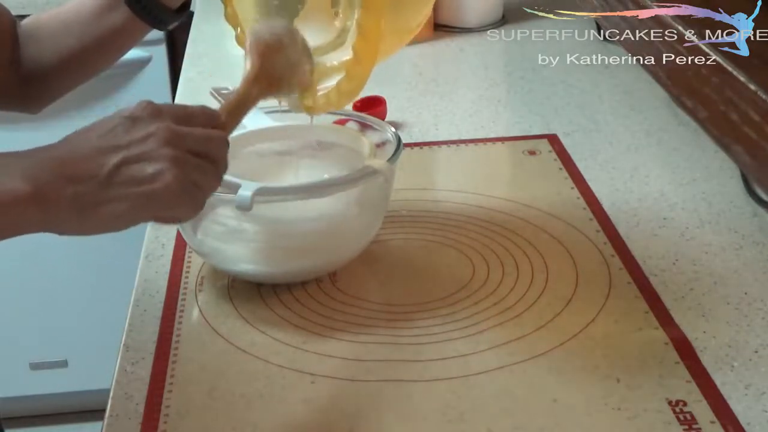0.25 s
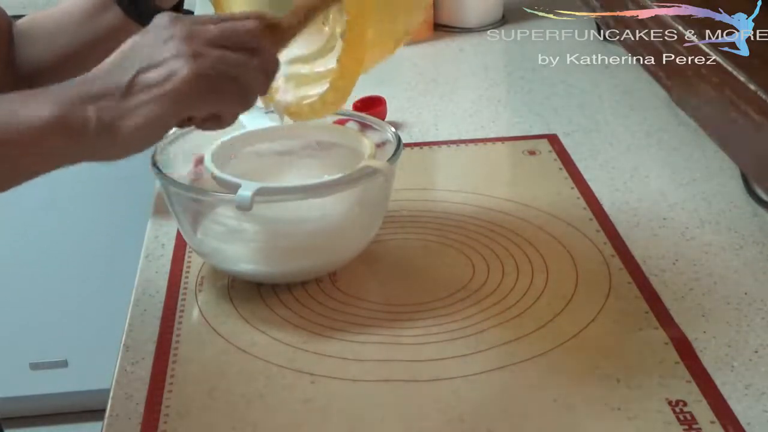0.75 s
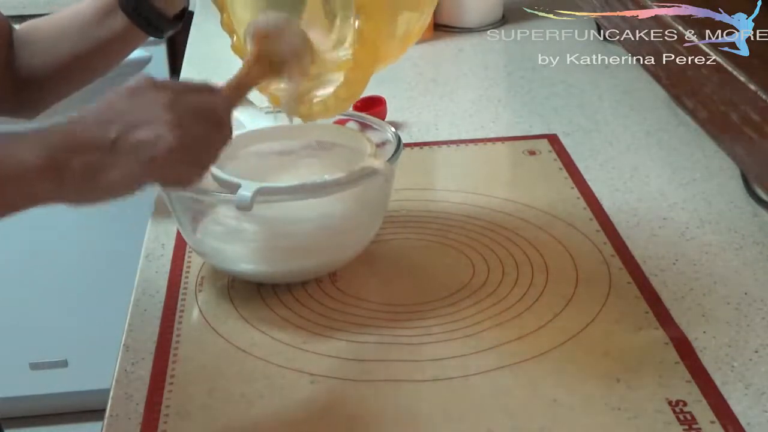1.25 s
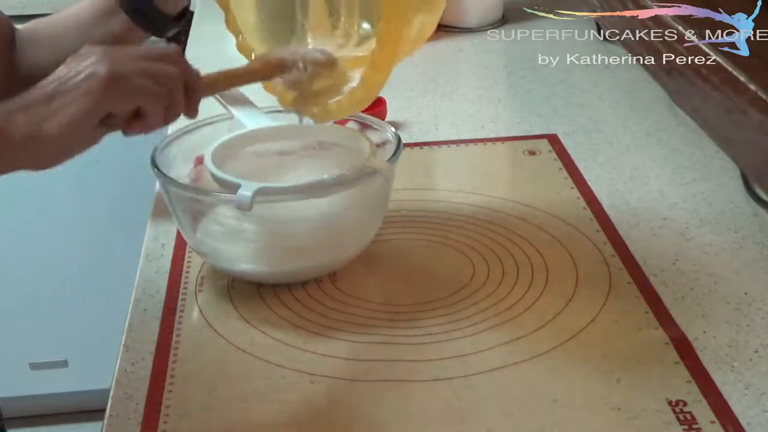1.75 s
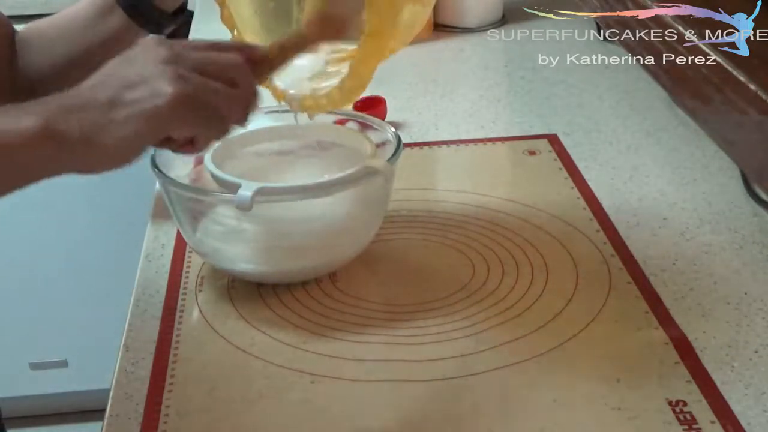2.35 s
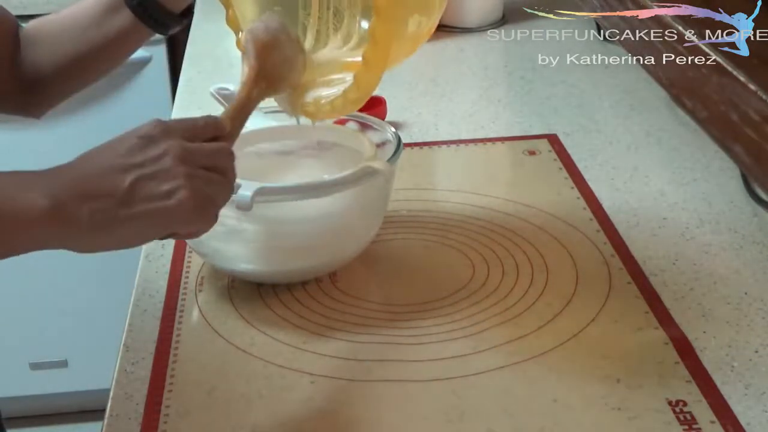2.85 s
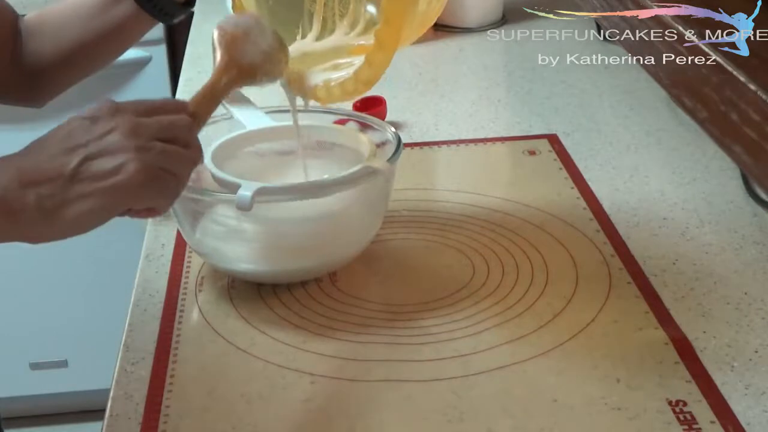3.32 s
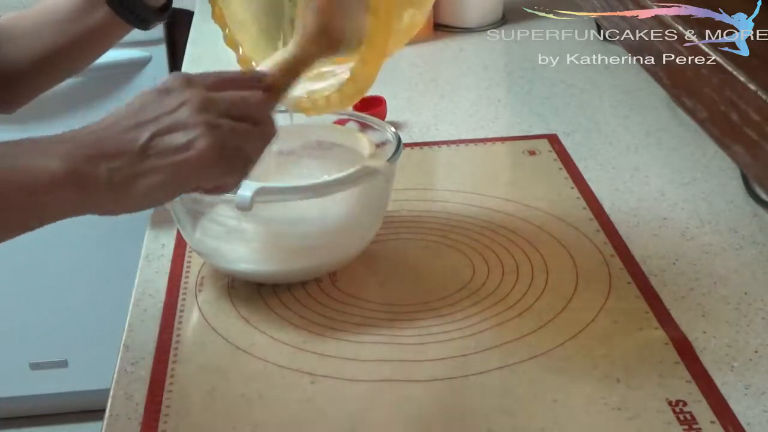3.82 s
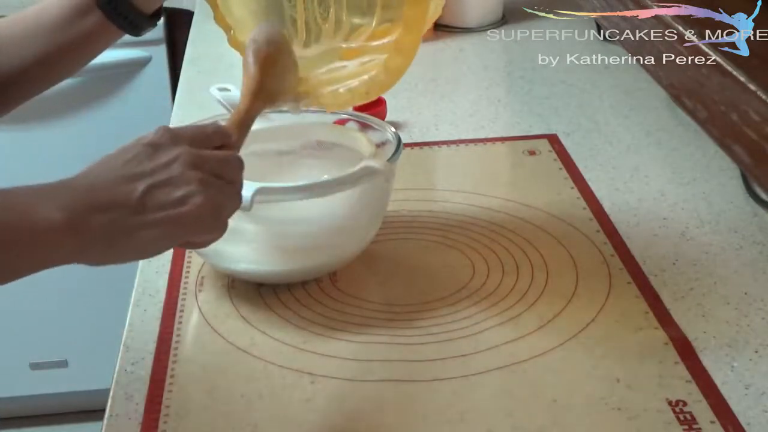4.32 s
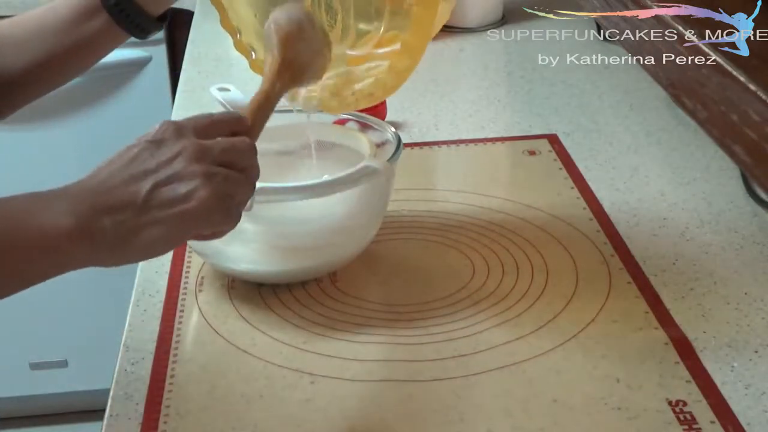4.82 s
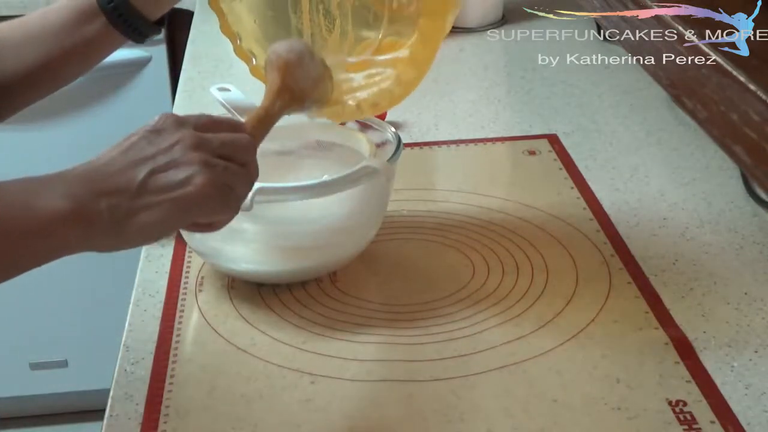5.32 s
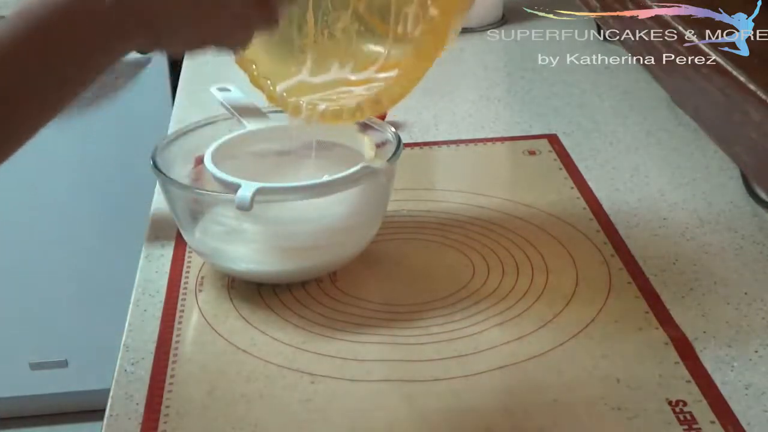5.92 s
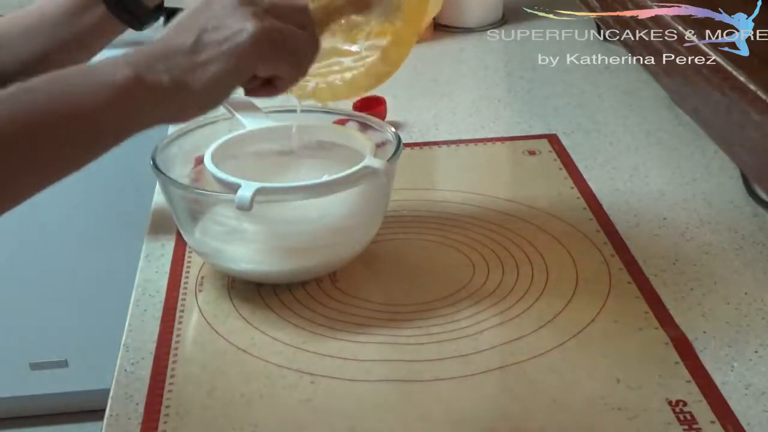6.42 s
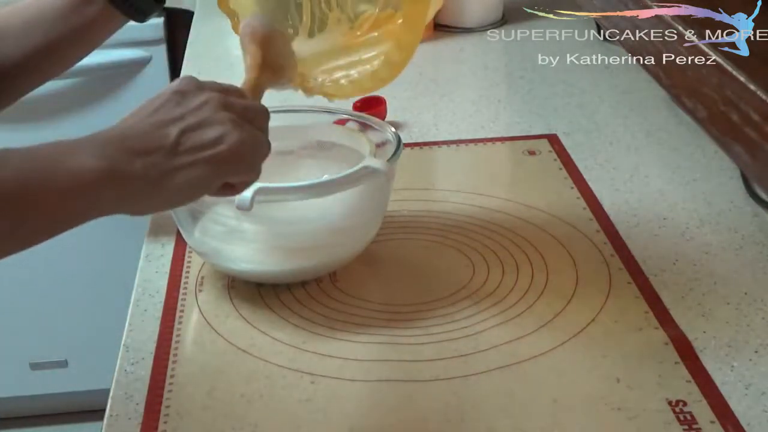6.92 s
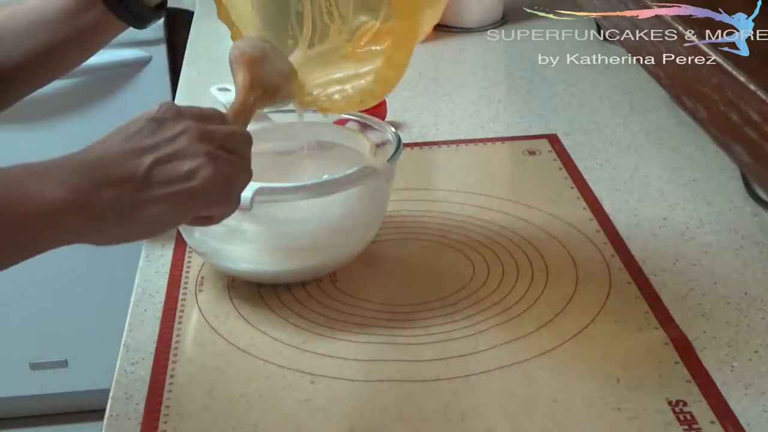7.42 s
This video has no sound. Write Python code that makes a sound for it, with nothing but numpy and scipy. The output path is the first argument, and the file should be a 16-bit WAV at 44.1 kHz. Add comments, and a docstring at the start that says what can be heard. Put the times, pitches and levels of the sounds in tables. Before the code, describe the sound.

A wooden spoon raps hard on a sieve over a glass bowl, then scrapes sticky batter from a plastic bowl over steady appliance hum.

```python
"""A wooden spoon is knocked clean over a sieve on a glass bowl and scrapes sticky batter out of a plastic bowl.
Each knock sums damped modes of spoon and bowl, a noise crack and a low thud of the counter.
Between knocks, patchy filtered noise hisses and short noise bursts smack as the spoon moves in the batter.
The place is a small hard kitchen, heard as a decaying diffuse noise tail at two closely spaced microphones.
An appliance hums throughout: motor harmonics with the drone and air noise of a fan."""
import sys
import numpy as np
from scipy import signal
from scipy.fft import rfft, irfft, next_fast_len
from scipy.io import wavfile
from scipy.ndimage import uniform_filter1d, map_coordinates

SR = 44100
rng = np.random.default_rng(int(sys.argv[2]) if len(sys.argv) > 2 else 0)


def transcribe(u):
    """Save the signal u as a 16-bit wav file named by the first command-line argument.

    u: samples, shape (n,) or (channels, n), limited to [-1, 1]; the rate is SR.
    q: integer samples, one column per channel.
    """
    v = np.clip(np.atleast_2d(u).T, -1, 1)
    q = np.round(v * 32767).astype(np.int16)
    wavfile.write(sys.argv[1], SR, q)


N = 338247


def amp(db):
    """Decibels to gain."""
    return 10 ** (np.asarray(db) / 20)


def unit(x):
    """x at rms 1."""
    return x / np.sqrt(np.mean(x ** 2) + 1e-20)


def along(points, hz):
    """(frequency, value) points read on a log frequency axis."""
    f, v = np.transpose(points)
    return np.interp(np.log(hz + 1), np.log(f + 1), v)


def filtered(x, response):
    """x with its spectrum multiplied by a response of frequency."""
    n = x.shape[-1]
    padded = next_fast_len(n + 8192)
    spectrum = rfft(x, padded) * response(np.fft.rfftfreq(padded, 1 / SR))
    return irfft(spectrum, padded)[..., :n]


def coloured(x, db_of_hz, size=2048):
    """x through a causal minimum-phase filter, which keeps attacks sharp."""
    cepstrum = irfft(np.log(amp(db_of_hz(np.fft.rfftfreq(size, 1 / SR)))))
    cepstrum[1:size // 2] *= 2
    cepstrum[size // 2 + 1:] = 0
    impulse = irfft(np.exp(rfft(cepstrum)))
    return signal.fftconvolve(x, impulse)[:len(x)]


def wobble(rate):
    """A smooth random curve, rate knots a second."""
    knots = rng.standard_normal(int(N * rate / SR) + 4)
    return map_coordinates(knots, [np.arange(N) * rate / SR])


def fade(t, t60):
    """Decay by 60 dB in t60 seconds."""
    return np.exp(-np.log(1000) * t / t60)


def ringing(modes, t, touch, scatter_db):
    """Damped modes of alternating sign, weighted by the (hz, db) touch and by chance."""
    total = 0
    for k, (hz, db, t60) in enumerate(modes):
        level_db = db + along(touch, hz) + scatter_db * rng.standard_normal()
        total = total + (-1) ** k * amp(level_db) * fade(t, t60) * np.sin(2 * np.pi * hz * t)
    return total


def add(track, s, sound):
    """Mix a sound into the track at time s, in seconds."""
    part = track[..., round(s * SR):][..., :sound.shape[-1]]
    part += sound[..., :part.shape[-1]]


def diffuse(pair):
    """Sound from all round at two close microphones: a shared part plus an opposed one, weak in the bass."""
    opposed_db = [(60, -14), (150, -22.0), (300, -20.0), (600, -8.0), (1200, -5.0),
                  (2400, -7.5), (4400, -6), (9000, -12.5), (14000, -47)]
    side = filtered(pair[1], lambda hz: amp(along(opposed_db, hz)))
    return np.array([pair[0] + side, pair[0] - side])


def placed(x, left_db, lead):
    """A source left of centre: louder at the left microphone, and lead seconds earlier."""
    half = np.array([[.5], [-.5]])
    return amp(left_db * half) * filtered(x, lambda hz: np.exp(2j * np.pi * hz * lead * (half - .5)))


MOTOR_HZ = 58.63  # turns per second
# motor lines, panned as by standing waves: multiple [of MOTOR_HZ], level_db [rms], left_right_db
MOTOR_LINES = [(1, -53.5, 1.5), (3, -48.5, 1.5), (4, -54, 3.5), (8, -54.5, -2), (10, -51, 0),
               (11, -43.5, -5), (12, -46, -1), (13, -67.5, -13)]
# fan and cabinet resonances: centre_hz, width_hz, level_db [rms]
FAN_DRONE = [(46.6, 4, -63), (112, 8.7, -59.5), (134.4, 16.3, -50.5), (182, 8.5, -51), (209, 24, -50),
             (239.1, 7.4, -39.5), (273.6, 40, -43.5), (348.4, 10.3, -52.5), (368.4, 4, -54),
             (516.4, 57, -49.5)]
# colour of the fan's air noise: freq_hz, density_db [per Hz, relative]
FAN_AIR = [(20, -22), (50, -6), (88, -25.5), (120, -11.5), (220, 6.5), (320, 2.5), (450, -1), (680, -4),
           (850, -6.5), (1300, -10.5), (2000, -20), (4000, -26), (9000, -34.5), (15500, -41)]


def appliance():
    """Neighbouring motor harmonics beat once a turn; the fan adds a wavering drone and air noise."""
    phase = 2 * np.pi * MOTOR_HZ * np.arange(N) / SR + 0.03 * wobble(3.17)
    total = np.zeros((2, N))
    for multiple, db, pan_db in MOTOR_LINES:
        level = np.sqrt(2) * amp(db + 0.64 * wobble(3.93))
        pan = amp([[pan_db / 2], [-pan_db / 2]])
        total += level * pan * np.cos(round(multiple) * phase)

    def noise(response):
        return unit(diffuse(filtered(rng.standard_normal((2, N)), response)))

    for centre, width, db in FAN_DRONE:
        total += amp(db) * noise(lambda hz: 1 / (1 + ((hz - centre) / width * 2) ** 2))
    return total + amp(-40.0) * noise(lambda hz: amp(along(FAN_AIR, hz)))


THUD_CYCLES, THUD_LAG_S = .75, 0.0013  # cycles until the thud is strongest; its delay after the contact


def thud(t, hz):
    """The counter gives for a cycle or two under a blow."""
    cycles = hz * np.maximum(t - THUD_LAG_S, 0)
    u = cycles / THUD_CYCLES
    return -u ** 2 * np.exp(2 - 2 * u) * np.sin(2 * np.pi * cycles)


def cushion(t):
    """Batter cushions the contact, so the ringing takes a few ms to reach full strength."""
    return 1 - np.exp(-t / 0.0015)


# spoon and the rim it meets, quickly damped: mode_hz, level_db [relative], t60_s
SPOON_MODES = [(340, 2, 0.049), (600, 1, 0.035), (801, 5, 0.03), (1118, 10, 0.038), (1376, 0, 0.065),
               (1833, 10.5, 0.025), (2222, 5, 0.031), (2900, -9, .028), (4060, 3.5, 0.028),
               (4870, 8, 0.0074)]


def spoon_clack(t, touch):
    """The wooden spoon's short modes sound against the rim."""
    return amp(-0.5) * cushion(t) * ringing(SPOON_MODES, t, touch, scatter_db=4.0)


# colour of the contact noise: freq_hz, density_db [per Hz, relative]
CRACK_COLOUR = [(100, -10), (500, -12), (1200, 4.5), (2200, 5), (3500, 1.5), (6000, -1), (9500, -1.5),
                (12000, -13), (16000, -23)]


def contact_crack(t, touch):
    """The contact itself is a fast burst of coloured noise."""
    burst = rng.standard_normal(len(t)) * fade(t, 0.022) * (1 - np.exp(-t / .0003))
    return amp(17) * coloured(burst, lambda hz: along(CRACK_COLOUR, hz) + along(touch, hz))


# glass bowl with the sieve on it: mode_hz, level_db [relative], t60_s
GLASS_MODES = [(276.4, 4, 0.22), (342.5, 0.5, 0.25), (443, 6, 0.44), (576.5, 4, 0.33), (747, 0, 0.32),
               (771, -13, 0.18), (824, -13, 0.39), (1011, 2.5, 0.11), (1127, 0.5, 0.37), (1177, -9, 0.15),
               (1217, 5, 0.21), (1408, -2, 0.12), (1620, -0.5, 0.23), (1807, -4, 0.55), (2260, -18, 0.2),
               (3120, -5, 0.098)]
# plastic bowl's wall, damped by the hand that holds it: mode_hz, level_db [relative], t60_s
WALL_MODES = [(273, 3.5, .2), (354, -3, .2), (445, -1, 0.38), (578, 4, 0.42), (910, -2, 0.23),
              (1405, 7, 0.24), (1770, 6, .22), (2010, -3, .17), (2280, 0, .25), (2580, 0, .19),
              (3070, 1, 0.13), (4027, -1, .18)]


def bowl_ring(t, touch, spot, sustain_db):
    """Rim and sieve ring the glass bowl, wall and batter the plastic one."""
    modes = GLASS_MODES if spot in ("rim", "sieve") else WALL_MODES
    # each mode reaches the two microphones at its own strength
    at_microphones = np.array([ringing(modes, t, touch, scatter_db=3.0) for _ in range(2)])
    return amp(sustain_db - 3.0) * cushion(t) * at_microphones


# what a knock radiates into the room: freq_hz, density_db [per Hz, relative]
KNOCK_RADIATION = [(60, -12), (160, 6), (270, -2), (430, -3), (620, -1), (900, -5.5), (1170, 7), (1500, 1),
                   (2000, 0), (3300, -7), (5500, -6.5), (9500, -9.5), (15000, -31)]


def radiated_pulse(t, touch):
    """The knock seen by the room: a single coloured impulse."""
    return coloured(1.0 * (t == 0), lambda hz: along(KNOCK_RADIATION, hz) + along(touch, hz))


# decay of the kitchen: freq_hz, t60_s
KITCHEN_DECAY = [(150, 0.03), (600, 0.4942), (3000, 0.4335), (10000, 0.39)]
# strength of its answer: freq_hz, level_db [relative]
KITCHEN_COLOUR = [(60, 12), (160, 10), (300, 12), (600, 8), (1200, -6), (2500, -1.5), (6000, -5.5),
                  (14000, -5)]


def kitchen(x):
    """The room's answer to x: a diffuse noise tail in which each frequency dies at its own speed."""
    hz, t, z = signal.stft(rng.standard_normal((2, SR // 2)), SR, nperseg=256)
    decay = fade(t, along(KITCHEN_DECAY, hz)[:, None])
    tail = signal.istft(z * decay, SR, nperseg=256)[1]
    tail = filtered(tail / np.linalg.norm(tail[0]), lambda f: amp(along(KITCHEN_COLOUR, f)))
    tail = diffuse(tail)
    # the walls need a few ms to answer
    build_up = 1 - np.exp(-(np.arange(tail.shape[1]) / SR / 0.0062) ** 2)
    return signal.fftconvolve(x[None], tail * build_up, axes=1)[:, :len(x)]


# centres of a knock's registers, thud, hollow, body, ring, clack, tick, splat: centre_hz
REGISTERS = [170, 360, 660, 1150, 2100, 5500, 10500]
# spoon knocks: start_s, spot, strength_db [relative], follow_through_db, hardness_db [per octave]
SPOON_KNOCKS = [(0.1297, "rim", -21, 5, -1.5), (0.3103, "rim", -27, 5, -.5),
                (0.4726, "rim", -28.5, 4, -1.5), (0.878, "sieve", -21, 5, 0),
                (1.5374, "wall", -26.5, -2.5, 0), (2.0163, "wall", -33.5, 1.5, -2.5),
                (2.46, "batter", -39, -2.5, -1.5), (3.4661, "rim", -19, 0, 0),
                (3.633, "rim", -19.5, -6.5, -0.4), (3.9441, "batter", -52.5, 1, -1.5),
                (4.6, "sieve", -21, -7, -1.5), (4.7773, "rim", -21.5, -3, 0.5),
                (4.95, "rim", -20.5, 3.5, 0.25), (5.1313, "rim", -21.5, 5.5, 0.5),
                (5.3184, "rim", -19, 4, 1), (5.6778, "batter", -39.5, 2.5, 3.5),
                (6.576, "batter", -49.5, 6, -0.5), (7.2062, "wall", -33.5, 3.5, 1.5)]
# where the spoon lands; the wall is hollow, batter thuds and splats:
# spot -> register_db [one per register], sustain_db, thud_hz
LANDING_SPOTS = {"rim": ([-6, -11.5, 0.5, -1.5, -5, -18, -32.5], -6, 180),
                 "sieve": ([-2.5, -13.5, -1.5, 1, -7, -25, -47], -6.5, 177),
                 "wall": ([8.5, 7.5, -2, 0.5, 3, -7.5, -23.5], -7.5, 223),
                 "batter": ([21.5, 9.5, 0.5, 1.5, -3, -3, -3], -8, 142)}
# following through feeds the bass: freq_hz, share [of the follow-through]
FOLLOW_SHARE = [(170, 1), (360, 0.46), (660, 0)]
FOLLOW_DAMPING = 0.55  # dB of sustain lost for each dB of follow-through
PIVOT_HZ = 864  # hardness tilts the sound about this frequency


def knocks():
    """The spot sets a knock's colour and hardness tilts it; following through thuds and damps the ring."""
    out, t = np.zeros((2, N)), np.arange(SR * 2 // 3) / SR
    registers = np.array(REGISTERS)
    octaves = np.log2(registers / PIVOT_HZ)
    for s, spot, strength_db, follow_db, tilt_db in SPOON_KNOCKS:
        colour_db, free_db, thud_hz = LANDING_SPOTS[spot]
        levels = strength_db + np.array(colour_db) + tilt_db * octaves
        levels = levels + follow_db * along(FOLLOW_SHARE, registers)
        touch = list(zip(REGISTERS, levels))
        sustain_db = free_db - FOLLOW_DAMPING * follow_db

        push = amp(levels[0] + 6.5) * thud(t, thud_hz)
        clack = spoon_clack(t, touch)
        bowl = bowl_ring(t, touch, spot, sustain_db)
        direct = placed(push, left_db=2.5, lead=.0001)
        direct = direct + placed(clack + bowl, left_db=1.5, lead=.00003)
        direct = direct + contact_crack(t, touch)

        answer = amp(sustain_db + 49.5) * kitchen(radiated_pulse(t, touch))
        answer = answer + amp(-13.5) * kitchen(bowl[0])
        add(out, s, direct + answer)
    return out


# scraping strokes: start_s, end_s, level_db [at the middle, relative], swell_db [per s]
SCRAPE_STROKES = [(0.96, 1.225, -52, 4), (1.613, 1.707, -48.5, -28), (2.083, 2.178, -48.5, -13),
                  (2.637, 3.15, -57.5, -28.5), (4.032, 4.358, -57.5, -2), (5.845, 6.292, -50, 21),
                  (6.64, 6.69, -55.5, 5), (6.785, 6.92, -52.5, -48), (7.29, 7.34, -52, -70)]
STROKE_ATTACK_S, STROKE_RELEASE_S = 0.026, 0.038  # the spoon sinks in and lifts off


def pressure():
    """The spoon's force on the batter: each stroke sinks in, swells or sags steadily, and lifts off."""
    t, force = np.arange(N) / SR, np.zeros(N)
    for start, end, db, swell_db in SCRAPE_STROKES:
        held = amp(db + swell_db * (np.clip(t, start, end) - (start + end) / 2))
        sink_in = np.maximum(start - t, 0) / STROKE_ATTACK_S
        lift_off = np.maximum(t - end, 0) / STROKE_RELEASE_S
        force += held * np.exp(-sink_in - lift_off)
    return force


# individually timed sticky smacks: start_s, level_db [before colouring, relative]
TIMED_SMACKS = [(.851, -35), (.878, -26), (1.6526, -32), (5.7445, -32), (5.8603, -33.5), (6.1415, -32),
                (6.2, -26), (6.2846, -41), (7.401, -37)]
SMACKS_PER_S, SMACK_DB, SMACK_SCATTER_DB = 9, 10, 6  # chance smacks, levels relative to the force


def smacks(force):
    """Batter lets go of the spoon with short wet clicks: timed ones, and chance ones that follow the force."""
    out, t = np.zeros(N), np.arange(SR // 16) / SR
    chance = rng.random(N) < SMACKS_PER_S / SR
    size_db = 20 * np.log10(force + 1e-9) + SMACK_DB + SMACK_SCATTER_DB * rng.standard_normal(N)
    small = [(i / SR, size_db[i]) for i in np.flatnonzero(chance)]
    envelope = fade(t, 0.022) * (1 - np.exp(-t / 0.00063))
    for s, db in list(TIMED_SMACKS) + small:
        add(out, s, amp(db + 0.5) * rng.standard_normal(len(t)) * envelope)
    wet_db = [(300, -33), (1500, 8), (3500, -1), (6500, -2), (10000, -2.5), (16000, -31)]
    return coloured(out, lambda hz: along(wet_db, hz))


# wood dragged through batter: freq_hz, density_db [per Hz, relative]
SMEAR_COLOUR = [(400, 1), (1200, 7.5), (2000, 6), (3000, 4), (4800, 1), (7000, 0), (8000, -4), (9500, -3.5),
                (11000, -5.5), (13000, -15), (16000, -21)]
# spoon and bowl resonances that scraping brings out: centre_hz, width_hz, boost_db [before its wavering]
SCRAPE_RESONANCES = [(1810, 200, 4), (3580, 150, 4.5), (6150, 260, 7), (9100, 910, 3.5)]


def scraping(force):
    """The spoon drags through batter: a patchy hiss thick with tiny bursting films."""
    t = np.arange(N) / SR
    burst_size = amp(2.3 * np.minimum(rng.exponential(size=N), 3))
    films = (rng.random(N) < 900 / SR) * rng.standard_normal(N) * burst_size  # 900 a second
    hz, frames, z = signal.stft(rng.standard_normal(N) + 0.46 * unit(films), SR, nperseg=512)
    patches = uniform_filter1d(rng.standard_normal(z.shape), size=5, axis=0)
    patches = unit(uniform_filter1d(patches, size=12, axis=1))
    colour_db = along(SMEAR_COLOUR, hz)[:, None] + 2.6 * patches
    # the moving contact point brings resonances in and out
    for centre, width, db in SCRAPE_RESONANCES:
        peak = 1 / (1 + (2 * (hz - centre) / width) ** 2)
        waver = 1 + 0.67 * np.interp(frames, t, wobble(9.1))
        colour_db += db * np.outer(peak, waver)
    hiss = signal.istft(z * amp(colour_db), nperseg=512)[1][:N]
    return force * amp(2.7 * wobble(60)) * unit(hiss)


# resonances of the plastic wall under the juddering spoon: mode_hz, level_db [relative], t60_s
JUDDER_MODES = [(1900, 0, .009), (2350, 0, .008), (2900, 0, .007), (3700, 0, .006), (6400, -6, .004),
                (9300, -9, .003)]


def judder(s, width, db):
    """A brief run of slips as the spoon drags hard over the plastic wall and excites its modes."""
    t = np.arange(N) / SR
    slips = (rng.random(N) < 2500 / SR) * rng.choice([-1, 1], N)  # 2500 a second
    wall = ringing(JUDDER_MODES, t[:SR // 16], [(2000, 0)], scatter_db=1)
    swell = np.exp(-((t - s) / width) ** 2)
    return amp(db) * swell * unit(signal.fftconvolve(slips, wall)[:N])


# hard drags over the plastic wall: middle_s, half_length_s, level_db [rms at the middle]
HARD_DRAGS = [(2.11, 0.0066, -40), (6.215, 0.0062, -31.5)]


def scene():
    """Knocks and batter sounds in the kitchen, over the hum."""
    hum, blows, force = appliance(), knocks(), pressure()
    batter = smacks(force) + scraping(force)
    drags = sum(judder(s, width, db) for s, width, db in HARD_DRAGS)
    answer = amp(-1.0) * kitchen(batter + 0.42 * drags)
    return blows + amp(0.5) * batter + drags + answer + hum


TOP_HZ = 15850  # upper band limit


def record(dry):
    """The microphone chain rounds off the highest peaks and keeps nothing above its band limit."""
    rounded = dry / (1 + np.abs(dry / .65) ** 4) ** (1 / 4)
    return filtered(rounded, lambda hz: hz < TOP_HZ)


dry = scene()
out = record(dry)
transcribe(out)
```